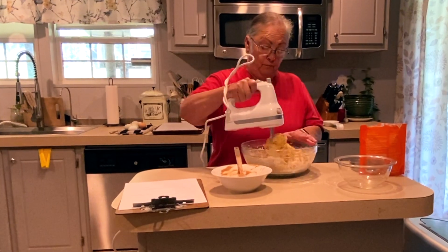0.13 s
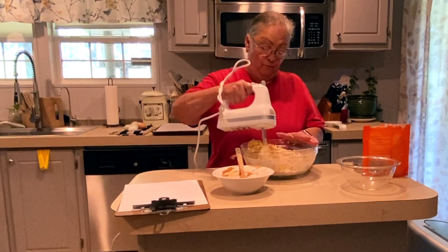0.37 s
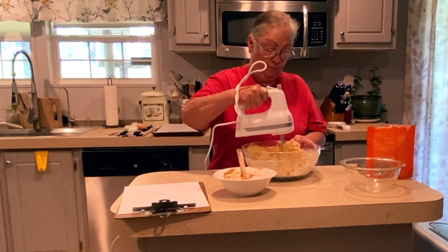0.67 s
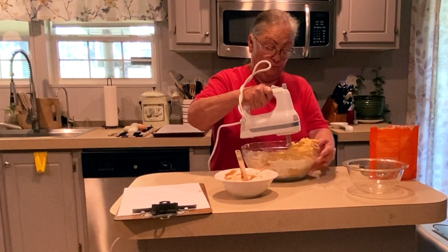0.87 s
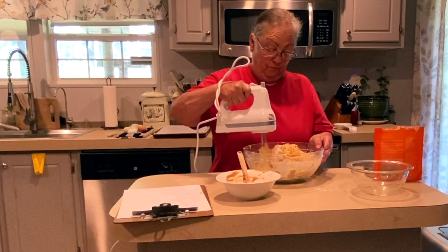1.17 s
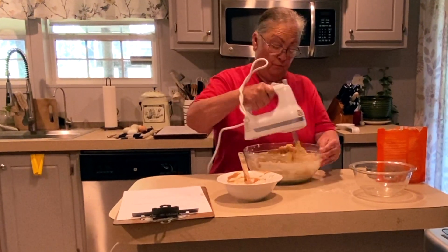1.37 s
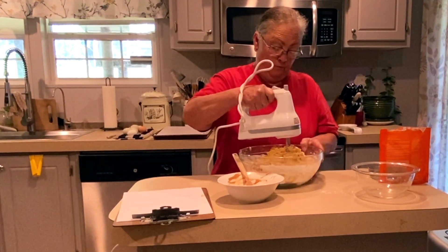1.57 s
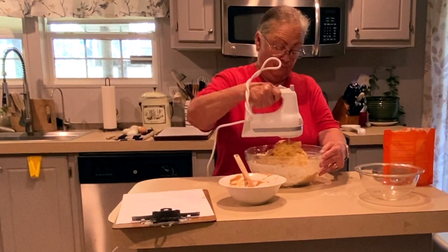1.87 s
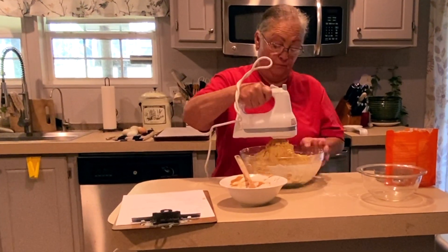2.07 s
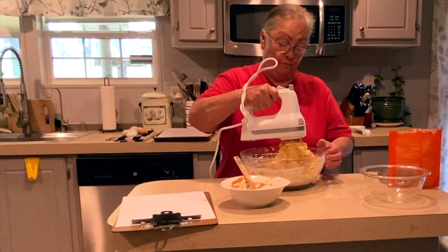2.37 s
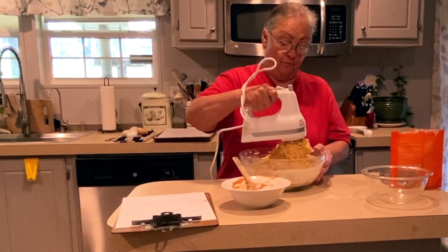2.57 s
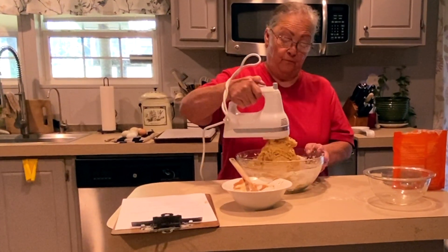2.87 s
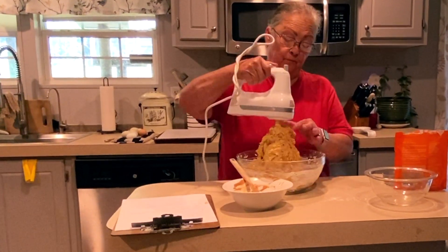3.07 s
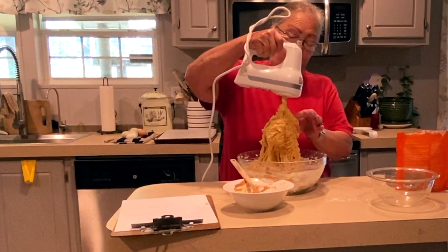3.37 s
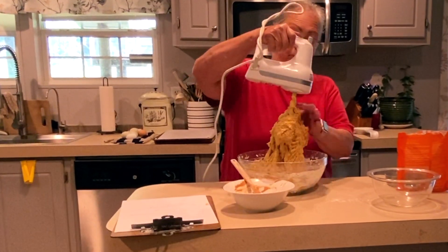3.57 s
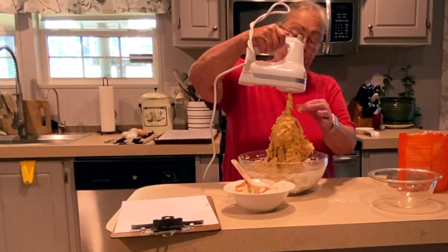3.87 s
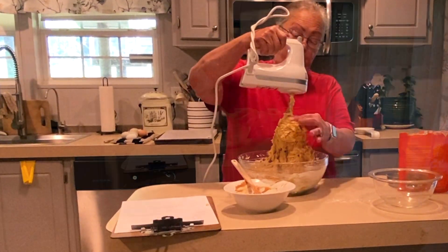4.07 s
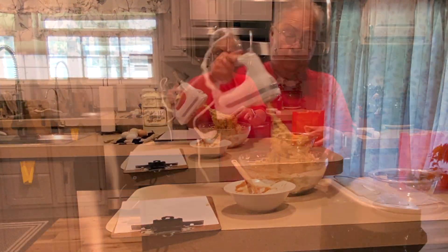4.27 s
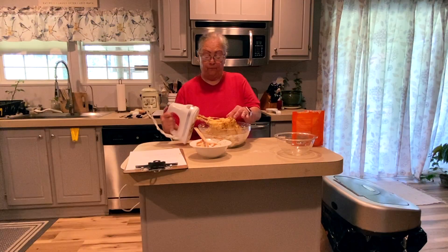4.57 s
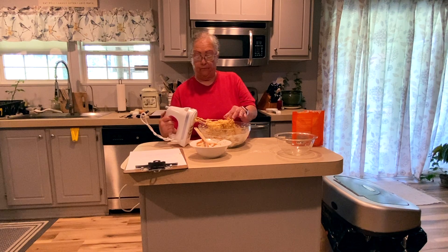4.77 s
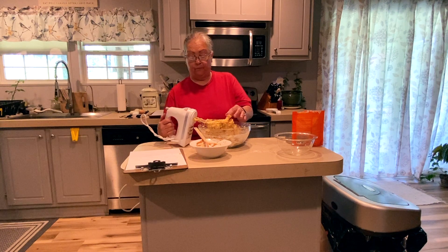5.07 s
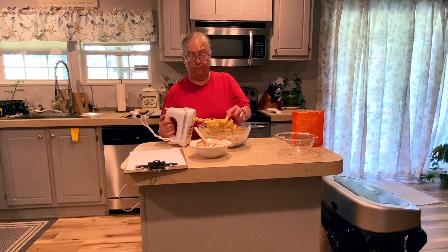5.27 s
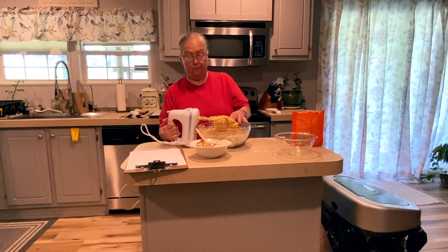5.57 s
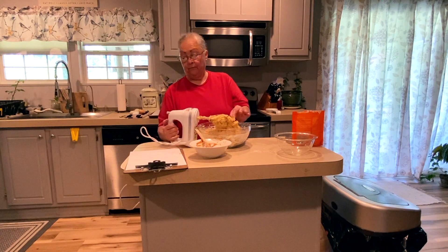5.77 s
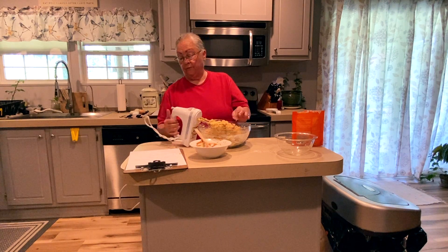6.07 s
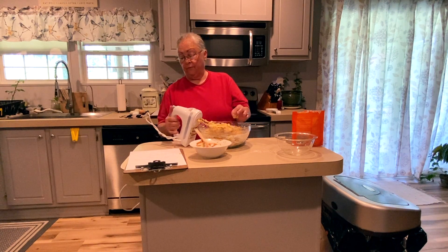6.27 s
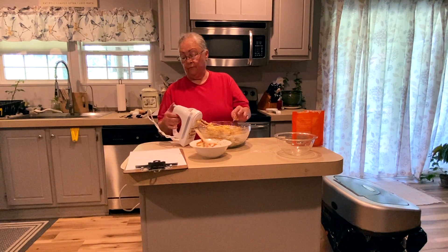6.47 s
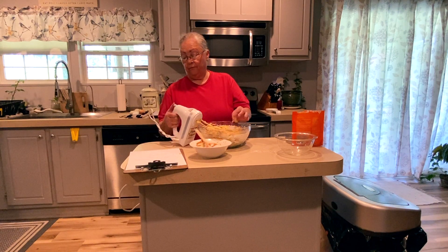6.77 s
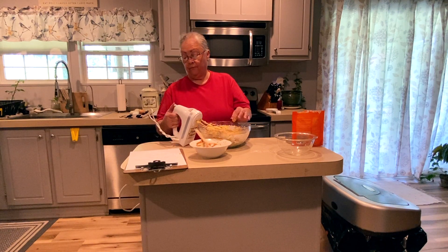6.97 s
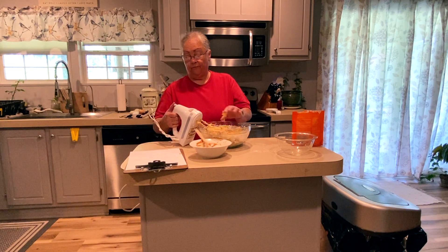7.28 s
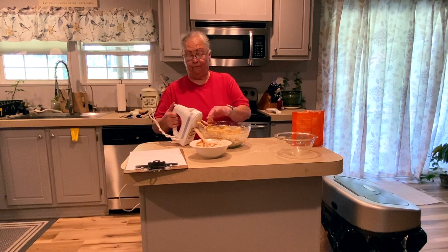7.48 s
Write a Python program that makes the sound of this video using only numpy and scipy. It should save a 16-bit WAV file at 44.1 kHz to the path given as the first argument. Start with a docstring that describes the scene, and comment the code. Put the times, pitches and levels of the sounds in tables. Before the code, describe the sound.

From 0 s a hand mixer is already running in thick dough: a rough nasal whine around 3 to 4 kHz, mains buzz, whirr and brush hiss, with the bowl juddering on a hollow wooden counter. The pitch sags under load and races upward in harsh surges at the very start, about 0.3-0.5, 0.8, 1.2-1.4, 1.9 and 2.5 s; a sharp tick lands near 0.33. Small squeaky ticks precede the abrupt switch-off at 2.9 s. Thin kitchen hum and very faint ticks remain until about 4.2, when a fuller, lower room tone fades in. A light tap near 4.5 leads to a heavy wooden knock at 4.65, another at 5.0, then clustered clunks at 5.4-5.6 with a bright glass bowl clink at 5.55. Softer bumps trail off, with a small thud near 6.2 and metallic beater clinks around 6.4-6.5, then quiet room tone. Close, small-room stereo sound.

```python
"""From the start a hand mixer labours through thick dough: its whine bends with the load and races up whenever
the beaters come free, over a mains buzz, brush hiss and a bowl juddering on a hollow wooden counter.
At 2.9 s the motor is switched off, leaving a small kitchen with a humming fridge and a few short ticks.
From 4.5 s the mixer is knocked down on the counter; bowl and beaters clink as the background grows fuller.
Whine and buzz are sine waves, hiss and air are shaped noise, and struck things are decaying resonances."""
import sys
import numpy as np
from scipy import signal
from scipy.fft import rfft, irfft, next_fast_len
from scipy.io import wavfile
from scipy.ndimage import uniform_filter1d

SR = 44100
rng = np.random.default_rng(int(sys.argv[2]) if len(sys.argv) > 2 else 0)


def unload_audio(sound):
    """Save the sound as a 16-bit wav file, at the path given as the first command line argument."""
    columns = np.transpose(np.atleast_2d(sound))
    # keep every value between -1 and 1, then stretch to whole-number steps
    steps = np.round(np.clip(columns, -1, 1) * 32767)
    wavfile.write(sys.argv[1], SR, steps.astype(np.int16))


N = 336639
T = np.arange(N) / SR  # time of every sample [s]
OFF_S = 2.885  # the motor is switched off
TOP_HZ = 15900  # upper edge of the sound


def undb(db):
    """Turn decibels into an amplitude factor."""
    return 10 ** (np.asarray(db) / 20)


def level(x, db):
    """Scale a signal to an average (RMS) level in dB."""
    return x * undb(db) / np.sqrt(np.mean(x ** 2))


def curves(rows):
    """Draw straight lines between the rows of a table whose first column is time."""
    time_s, *columns = np.transpose(rows)
    return [np.interp(T, time_s, column) for column in columns]


def colour(x, points):
    """Shape the spectrum by (frequency [Hz], gain [dB]) points."""
    hz, db = np.transpose(points)
    size = next_fast_len(N)
    bin_hz = np.maximum(np.arange(size // 2 + 1) * SR / size, 1)
    gain = undb(np.interp(np.log(bin_hz), np.log(hz), db))
    return irfft(rfft(x, size) * gain, size)[..., :N]


def between(x, lo_hz, hi_hz):
    """Keep only the sound between two frequencies."""
    return signal.sosfilt(signal.butter(3, (lo_hz, hi_hz), "band", fs=SR, output="sos"), x)


def band(x, hz, width_hz):
    """Pass a signal through one resonance with gain 1 at its centre."""
    return signal.lfilter(*signal.iirpeak(min(hz, SR / 2.2), hz / width_hz, SR), x)


def ring(x, modes):
    """Let a signal strike decaying resonances; a unit click rings each at its dB."""
    out = 0
    for hz, db, t60 in modes:
        pole = np.exp(2j * np.pi * hz / SR - np.log(1000) / (t60 * SR))
        out = out + undb(db) * signal.lfilter([1], [1, -pole], x).imag
    return out


def walk(rate):
    """Wander smoothly at random: levels held 1 / rate s, then smoothed twice."""
    hold = int(SR / rate)
    steps = np.repeat(rng.standard_normal(N // hold + 1), hold)
    return uniform_filter1d(uniform_filter1d(steps, hold), hold)[:N]


def grit(rate, spread_db):
    """Scatter clicks of uneven size, about `rate` per second, as from tiny contacts."""
    happens, sign, size = rng.random((N, 3)).T
    clicks = np.sign(sign - .5) * undb(-spread_db * np.log(1 - size))
    return level((happens < rate / SR) * clicks, 0)


def bursts(rows, release=.06):
    """Add up swells of (start [s], level [dB], rise [s], t60 [s], damped after [s]); release is a t60 [s]."""
    env = np.zeros(N)
    for start, db, rise, t60, damped in rows:
        first = int(start * SR)
        t = T[first:int((start + rise + 1.2 * t60) * SR)] - start
        fall_db = 60 * (np.maximum(t - rise, 0) / t60 + np.maximum(t - damped, 0) / release)
        env[first:][:len(t)] += undb(db - fall_db) * np.clip(t / max(rise, 1e-3), 0, 1)
    return env


# Colour of the thin and the full kitchen air: (frequency [Hz], relative level [dB])
AIR_THIN_COLOUR = [(35, -102), (60, -76), (167, -16.5), (206, -28.5), (225, 0.5), (264, -11), (381, -9.5),
                   (417, -17), (478, -10.5), (674, -14), (886, -9.5), (1220, -1.5), (14000, -50.5)]
AIR_FULL_COLOUR = [(15, -59.5), (25, -48), (65, -17.5), (119, -5), (155, -19.5), (213, -3), (309, 0.5),
                   (741, -15.5), (1200, -25.5), (3200, -40), (5000, -44), (9000, -51.5), (14000, -61)]
# Steady tones in each air: (frequency [Hz], level before a 2.5 dB cut [dB])
TONES_THIN = [(236.9, -64.5), (479.1, -66.5), (899.0, -60), (1184, -77), (1895, -75), (2159, -66.5),
              (2875, -71.5)]
TONES_FULL = [(3499, -78)]
# The full air fades in over: (start [s], end [s])
AIR_FADE = (4.17, 4.65)


def air():
    """Shaped noise and steady tones make the air; a thin one gives way to a fuller one."""
    full = np.interp(T, AIR_FADE, (0, 1))
    out = 0
    for points, db, tones, share, flicker_db in ((AIR_THIN_COLOUR, -56, TONES_THIN, 1 - full, 1.2),
                                                 (AIR_FULL_COLOUR, -55, TONES_FULL, full, 3.0)):
        noise = level(colour(rng.standard_normal(N), points), db)
        noise = noise * undb(flicker_db * walk(18))
        hum = sum(undb(tone_db - 2.5 + 2.5 * walk(12)) * np.sin(2 * np.pi * hz * T) for hz, tone_db in tones)
        out = out + share * (noise + hum)
    return out


# Short ticks, clatter, squeaks and scrapes of mixer, bowl and beaters:
# (time [s], level [dB], centre [Hz], width of each filter pass [Hz])
TICKS = [(.333, -19, 5000, 2520), (1.388, -26.5, 5430, 6150), (1.408, -23, 2820, 4015),
         (2.196, -29, 7030, 400), (2.69, -34, 12450, 797), (2.726, -30.5, 12100, 2509),
         (2.75, -29.5, 12540, 2500), (2.785, -33.5, 11950, 3960), (2.85, -29, 6000, 6000),
         (2.855, -26.5, 1946, 152), (2.925, -51, 12000, 9000), (3.264, -64, 6000, 6000),
         (3.927, -66, 5999, 6000), (4.346, -51.5, 2180, 480), (4.386, -57.5, 8900, 5000),
         (4.551, -54.5, 3440, 5000), (5.546, -48, 3300, 1200), (6.392, -52, 3850, 500),
         (6.423, -44, 990, 700)]


def ticks():
    """Short ticks, clatter, squeaks and scrapes: brief noise passed twice through one resonance."""
    t60 = .07  # s
    out = np.zeros(N)
    for time_s, db, hz, width_hz in TICKS:
        start, size = int(time_s * SR), SR // 5
        noise = rng.standard_normal(size)
        noise = level(band(band(noise, hz, width_hz), hz, width_hz), 0)
        swell = bursts([(time_s, db, .005, t60, t60)])
        out[start:start + size] += noise * swell[start:start + size]
    return out


# Resonances of the glass bowl and the steel beaters: (frequency [Hz], level [dB], t60 [s])
BOWL_MODES = [(1001, -12, .15), (1739, 2, .14), (1790, -6, .07), (1960, -4, .06), (2040, -6, .07),
              (2300, -6, .04), (2670, -3, .12), (3100, -8, .035), (3768, -11, .06), (4936, -14, .025)]
BEATER_MODES = [(1030, -5.5, .04), (1237, -9, .06), (1994, -2.5, .03), (3470, -10.5, .03), (3880, -8, .04),
                (5600, -9, .03), (6050, -10, .02), (7150, -3, .035), (7397, -5, .06), (8861, -6, .03)]
# Taps and scrapes on each: (time [s], level before the trims below [dB], chatter t60 [s], lowest sound [Hz])
BOWL_HITS = [(4.634, -36, 0.0197, 1804), (5.5465, -9, 0.046, 530), (5.56, -25.5, 0.34, 1195)]
BEATER_HITS = [(6.388, -39.5, .3, 3270), (6.479, -20.5, .15, 530)]


def clinks():
    """Bowl and beaters ring at their own pitches after a tap and the chatter that follows it."""
    tap_db, chatter_db = -12.5, -32.5  # trims on the level of a hit
    out = 0
    for hits, modes, hi_hz in ((BOWL_HITS, BOWL_MODES, 5500), (BEATER_HITS, BEATER_MODES, 11000)):
        for time_s, db, t60, lo_hz in hits:
            contacts = grit(3000, 2.2) * bursts([(time_s, db + chatter_db, .002, t60, .15)])
            contacts[int(time_s * SR)] += undb(db + tap_db)
            out = out + between(ring(contacts, modes), lo_hz, hi_hz)
    return out


# Resonances of the counter top, side panels and cabinet: (frequency [Hz], relative level [dB], t60 [s])
TOP_MODES = [(241.3, -13, 0.3), (304.7, 5.5, 0.13), (343, 8, 0.053), (417, 2, .06), (488, 1, 0.074),
             (541, -7, 0.17)]
PANEL_MODES = [(800, 7, 0.021), (888, 12.5, 0.023), (986.5, 6.5, 0.024), (1129, 7.5, 0.04),
               (1282, -6, 0.061), (1410, -13.5, 0.066), (1741.8, -8.5, 0.19), (1895, -4.5, 0.036)]
CABINET_MODES = [(75, -12, .22), (112, -9, .13), (148, -2, .16)]
# Judders of the bowl: (time [s], level [dB], sharpness [dB], rise [s], t60 [s], damped after [s])
JUDDERS = [(0, -1, -14.5, 0.00035, 0.066, 0.073), (.074, -18, -22.5, .007, 0.94, 0.081),
           (.245, -16.5, -22.5, .01, 1.1, 0.056), (.3, -7, -17.5, 0.029, 0.3, 0.12),
           (0.399, -7.5, -18, 0.065, 0.25, 0.1), (0.699, -36, -12, 0.017, 0.72, 0.15),
           (.795, -24, -19, .03, .5, .06), (.832, -8.5, -3, .015, 0.3, .1),
           (0.901, -17, -12.5, 0.017, 0.61, .11), (1.248, -22.5, -22.5, 0.022, 1, 0.064),
           (1.302, -6, -8, 0.047, 1.1, 0.1216), (1.55, -44, -14, 0.015, 0.39, .2),
           (1.899, -31.5, -32, 0.034, 0.23, 0.0592), (1.946, -13.5, -40.5, 0.015, 0.1, 0.028),
           (1.976, -14, -30, 0.0098, 0.12, 0.053), (2.08, -32.5, -4.5, 0.017, 0.18, 0.018),
           (2.148, -19.5, -26, 0.037, 0.224, 0.051), (2.2, -26, -22, 0.018, 4.05, 0.39),
           (2.46, -13.5, -27, 0.094, 0.12, 0.098), (2.777, -29, -18, 0.0184, 0.133, 0.0403)]
# Knocks, with relative levels: (time [s], top [dB], panels [dB], rattle [dB], cabinet [dB], rise [s], t60 [s])
KNOCKS = [(4.47, -30, -36, -37, -58, 0.0098, 0.16), (4.551, -45.5, -52, -55.5, -55, 0.004, 0.23),
          (4.653, 4.5, -12, -28, -8.5, 0.027, 0.38), (5.003, -20, -30, -33, -39, 0.023, .12),
          (5.023, -.5, -21, -34, -10.5, 0.026, 0.3296), (5.416, -15, -45, -58.5, -21, 0.0223, 0.49),
          (5.443, -5, -39, -58, -15.5, 0.021, .35), (5.487, -9.5, -32, -50.5, -11.5, 0.018, 0.29),
          (5.524, -8, -25.5, -51, -10.5, 0.012, 0.25), (5.599, -26.5, -48.5, -56.5, -17, 0.017, 0.67),
          (5.796, -39.5, -58, -62.5, -48, 0.016, 0.47), (5.856, -38.5, -53.5, -64, -30, 0.012, .23),
          (5.897, -32.5, -61, -68.5, -30, 0.021, 0.26), (5.953, -35.5, -57, -67.5, -29, 0.028, 0.65),
          (6.099, -41, -69, -75, -33, 0.013, 0.22), (6.171, -32, -54.5, -73.5, -15.5, 0.026, 0.138),
          (6.239, -50, -64, -78.5, -45.5, 0.016, 0.33), (6.448, -51.5, -51, -52.5, -37.5, 0.021, 0.11),
          (6.484, -37.5, -45.5, -48, -33, 0.0042, 0.318), (6.528, -33, -52.5, -56, -36, 0.0037, 0.48)]
# Rattle bands: (frequency [Hz], share of the knock's t60 [1])
RATTLE_BANDS = [(2500, 0.51), (4500, 0.67), (8000, 0.17), (13000, .3)]


def counter():
    """Judders and knocks set wooden top, panels and cabinet ringing; loose things rattle with the knocks."""
    judder_start, judder_db, sharp_db, *shape = np.transpose(JUDDERS)
    stir = undb(-53 + 2.4 * walk(15)) * (T < OFF_S)  # steady shaking between the judders
    judder = stir + bursts(zip(judder_start, judder_db, *shape))
    sharp = stir * undb(-5.5) + bursts(zip(judder_start, judder_db + sharp_db, *shape))

    start, top_db, panel_db, rattle_db, cabinet_db, rise, t60 = np.transpose(KNOCKS)
    start = start - .006  # each knock starts 6 ms before its listed time and swells in
    damped = np.full(len(start), .21)  # s
    release = .16  # t60 once a knock is damped [s]

    out = 0
    for modes, lo_hz, hi_hz, drive, db in ((TOP_MODES, 170, 750, judder, top_db - 9.5),
                                           (PANEL_MODES, 600, 2300, sharp, panel_db)):
        shake = between(grit(900, 0.32), lo_hz, hi_hz)
        gain = 1 / np.std(ring(shake, modes))
        strength = drive + bursts(zip(start, db, rise, t60, damped), release)
        out = out + gain * between(ring(shake * strength, modes), lo_hz, hi_hz)

    # the heavy cabinet feels a knock as one push; two weaker bounces follow
    pushes = np.zeros(N)
    for bounce in range(3):
        when = start + .012 + bounce * .043
        pushes[(when * SR).astype(int)] += undb(cabinet_db - 6.5 * bounce)
    pushes = pushes + grit(900, 1.5) * judder * undb(-63.5)  # a little of the judder gets through
    out = out + between(ring(pushes, CABINET_MODES), 65, 220)

    # each higher band is weaker, more so for knocks that rattle over 32 dB less than the top sounds
    tilt_db = -6 + .25 * np.minimum(rattle_db - top_db + 32, 0)
    for step, (hz, share) in enumerate(RATTLE_BANDS):
        rattle = level(between(grit(4600, 0.8), 0.62 * hz, min(1.29 * hz, TOP_HZ)), 0)
        swells = zip(start, rattle_db + step * tilt_db, 2 * rise, share * t60, damped)
        out = out + rattle * bursts(swells, release)
    return out


# Whine while the dough holds the beaters: (time [s], pitch [Hz])
LOADED_PITCH = [(0, 3864), (.14, 3590), (.17, 3960), (.29, 3806), (.52, 3765), (.65, 3740), (.72, 3959),
                (.8, 4060), (.95, 3664), (1.17, 3640), (1.21, 3808), (1.48, 3210), (1.66, 3390),
                (1.76, 3330), (1.84, 3080), (1.9, 3150), (2.04, 3701), (2.13, 3830), (2.35, 3844),
                (2.4, 3508), (2.47, 3270), (2.7, 3076), (2.9, 3306)]
# The beaters come free: (start [s], added pitch [Hz], rise [s], hold [s], fall [s], rasp level [dB])
RACES = [(-.1, 1300, 0.042, 0.064, 0.035, -32), (0.286, 2200, 0.073, 0.12, 0.024, -37),
         (0.792, 802, 0.058, 0.0049, 0.066, -40), (1.21, 2300, .14, .02, .11, -33),
         (1.905, 1464, .075, 0.0044, .06, -38), (2.496, 750, 0.041, 0.027, 0.038, -39.5)]


def speed():
    """Whine pitch and rasp: load sets the pitch; both race up whenever the beaters come free."""
    (hz,), rasp = curves(LOADED_PITCH), 0
    for start, gain_hz, rise, hold, fall, rasp_db in RACES:
        corners = np.cumsum([0, rise, hold, fall])
        free = np.sin(np.pi / 2 * np.interp(T - start, corners, [0, 1, 1, 0]))
        hz = hz + gain_hz * free
        rasp = rasp + undb(rasp_db) * free
    return hz, rasp


BUZZ_HZ = 479.3  # spacing of the mains buzz tones and of the whine's side tones
# The whine throbs with the mains: (multiple of BUZZ_HZ [1], relative level [dB])
WHINE_TONES = [(-2, -30), (-1, -5), (0, 7), (1, 6), (2, -2)]
# Resonances of the housing: (frequency [Hz], width [Hz], relative level [dB])
HOUSING = [(3699, 250, 6), (4200, 200, 6), (3100, 400, 1.5)]
# Whine near the housing resonances: (time [s], relative level [dB])
WHINE_LEVEL = [(0, -34.5), (.02, -36.5), (.1, -26), (.14, -22.5), (.21, -39.5), (.25, -24), (.29, -21),
               (.38, -42.5), (.5, -38.5), (.53, -29.5), (.61, -27), (.7, -25.5), (.78, -35), (.9, -35.5),
               (1.0, -28.5), (1.04, -42.5), (1.12, -27), (1.17, -37.5), (1.21, -26.5), (1.26, -38.5),
               (1.5, -38.5), (1.66, -36), (1.8, -38), (1.99, -42), (2.06, -28.5), (2.15, -27.5),
               (2.19, -32.5), (2.36, -32), (2.41, -39.5), (2.65, -36.5), (2.88, -43.5)]
# Whine at two and three times its pitch, by where it falls: (frequency [Hz], level [dB])
SECOND_PARTIAL = [(6200, -52.5), (6800, -59), (7300, -70), (7600, -53.5), (8000, -45), (9500, -39.5),
                  (12000, -35)]
THIRD_PARTIAL = [(9300, -71.5), (10300, -62.5), (10900, -52), (11500, -47.5), (12200, -47.5), (13000, -56),
                 (14000, -70)]
# Mains buzz, raised by 3 dB when played: (time [s], 3rd multiple [dB], 4th multiple [dB], 5th multiple [dB])
BUZZ_LEVEL = [(0, -54, -55, -53), (.45, -57, -55, -50), (.75, -54, -46, -47), (1.2, -55, -50, -50),
              (1.5, -55, -49, -53), (1.85, -53, -43, -53), (2.1, -57, -58, -54), (2.3, -47, -58, -49),
              (2.5, -47, -54, -47), (2.86, -48, -54, -53)]
# Colour of the steady whirr: (frequency [Hz], relative level [dB])
WHIRR_COLOUR = [(88, -44), (150, -18.5), (297, -8.5), (805, -21), (1420, -8), (1940, -6), (2600, -10),
                (3700, -5), (5250, -18), (14000, -56), (16000, -70.5)]


def motor():
    """Commutator whine chopped by the mains rings through the housing, with buzz and brush hiss beside it."""
    hz, racing_rasp = speed()
    racing = np.clip(hz / 4000 - 1, 0, 1)  # starts above 4000 Hz, full at twice that
    # load makes the speed wobble; it trembles more the faster it races
    tremble = .014 + .06 * racing
    phase = 2 * np.pi * np.cumsum(hz * (1 + .022 * walk(60) + tremble * walk(500))) / SR
    mains = 2 * np.pi * BUZZ_HZ * T

    tones = 0
    for multiple, db in WHINE_TONES:
        strength = undb(db + 5.0 * walk(45))
        drift = np.cumsum(walk(80)) * 150 / SR
        tones = tones + strength * np.sin(phase + multiple * mains + drift)
    tones = sum(undb(db) * band(tones, centre, width) for centre, width, db in HOUSING)
    tones = level(between(tones, 2500, 4550), -2)
    rough = level(band(rng.standard_normal(N), 3600, 1600), -22.5)
    whine_db, = curves(WHINE_LEVEL)
    whine = undb(whine_db) * (tones * undb(-110 * racing) + rough)

    # the rasp spreads up to about 700 Hz on either side of the racing whine
    rasp = level(between(grit(3000, 2.0), 30, 700) * np.sin(phase), 0)
    scream = racing_rasp * undb(3.0 * walk(60)) * rasp

    upper = 0
    for multiple, points in ((2, SECOND_PARTIAL), (3, THIRD_PARTIAL)):
        db = np.interp(multiple * hz, *np.transpose(points))
        upper = upper + undb(db + 9.0 * walk(70)) * np.sin(multiple * phase)

    buzz = 0
    for multiple, db in enumerate(curves(BUZZ_LEVEL), start=3):
        buzz = buzz + undb(db + 3 + 2 * walk(15)) * np.sin(multiple * mains)
    for multiple, db in ((2, -56.0), (6, -54.5)):
        buzz = buzz + undb(db + 2.0 * walk(5)) * np.sin(multiple * mains)

    hiss = level(between(grit(4200, 2.6), 5300, 11000), -0.058)
    hiss = hiss + undb(-9) * level(between(grit(6000, 1.5), 11000, 15000), 0)
    hiss = hiss * undb(-54 + 31.5 * racing)  # brushes hiss louder when racing
    whirr = level(colour(rng.standard_normal(N), WHIRR_COLOUR), -41.5)
    running = undb(-60 * np.maximum(T - OFF_S, 0) / .011)  # runs down by 60 dB in 11 ms
    return running * (whine + scream + upper + buzz + hiss + whirr)


# Difference between the ears in the room's echo: (frequency [Hz], gain [dB])
ECHO_WIDTH = [(60, -17.5), (300, -15.5), (500, -7), (2000, -2), (12000, -1.5)]


def room(dry):
    """Small-room echo: fading noise smears the sound, differing between the ears mostly in the treble."""
    t60, echo_db = 0.15, -7.5  # s, dB
    t = T[:SR // 2]
    tails = rng.standard_normal((2, len(t))) * undb(-60 * t / t60)
    tails /= np.sqrt(np.sum(tails ** 2, axis=1, keepdims=True))
    echo = signal.fftconvolve(dry[None], tails, axes=1)[:, :N]
    mid = dry + undb(echo_db) * between(echo[0], 530, TOP_HZ)
    side = colour(echo[1], ECHO_WIDTH)
    return np.array([mid + side, mid - side])


def scene():
    """All sources together in the small kitchen."""
    return room(air() + ticks() + clinks() + counter() + motor())


def record(dry):
    """The loudest peaks clip, then everything above TOP_HZ is cut."""
    cut = signal.ellip(8, .2, 70, TOP_HZ, fs=SR, output="sos")
    return signal.sosfilt(cut, np.clip(dry, -1, 1))


dry = scene()
out = record(dry)
unload_audio(out)
```